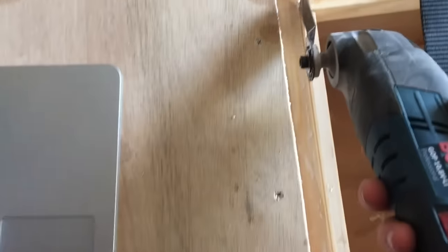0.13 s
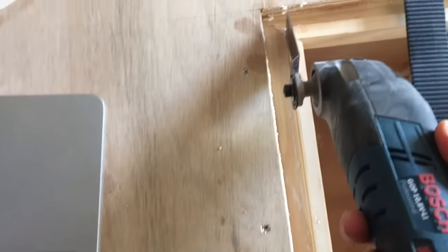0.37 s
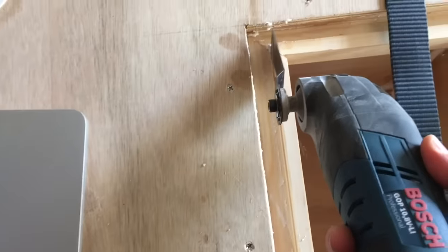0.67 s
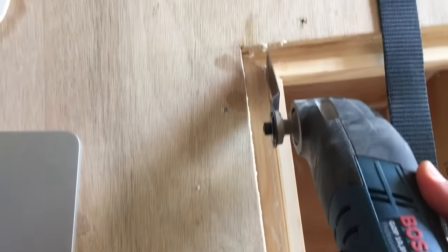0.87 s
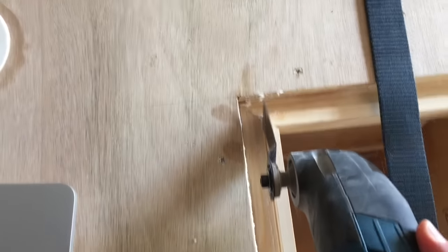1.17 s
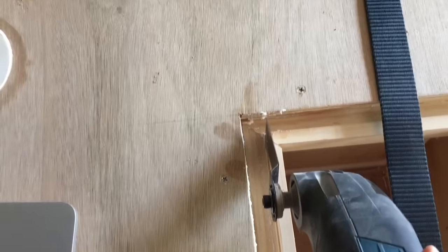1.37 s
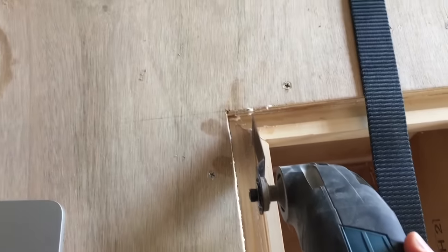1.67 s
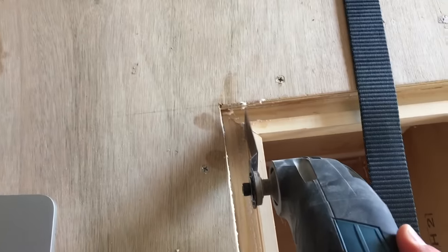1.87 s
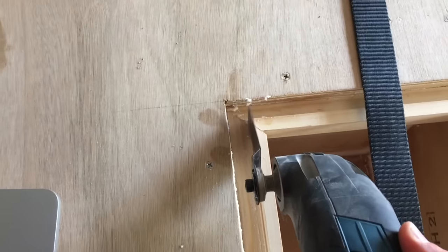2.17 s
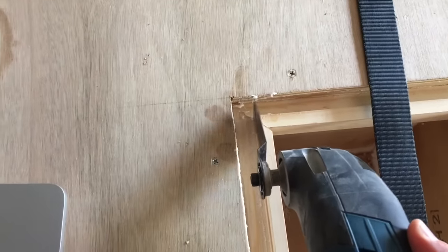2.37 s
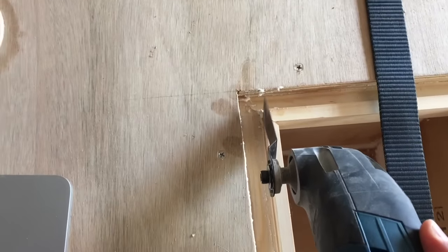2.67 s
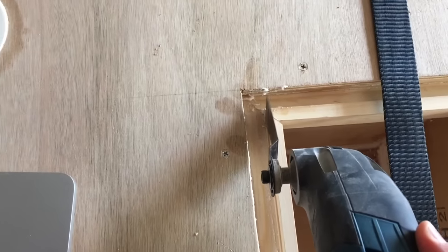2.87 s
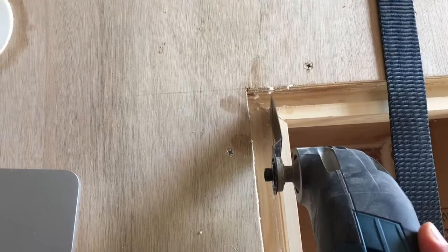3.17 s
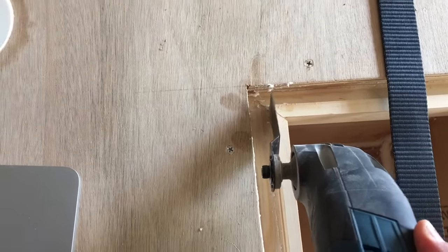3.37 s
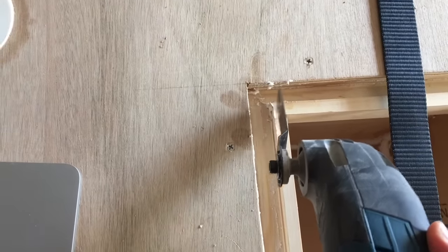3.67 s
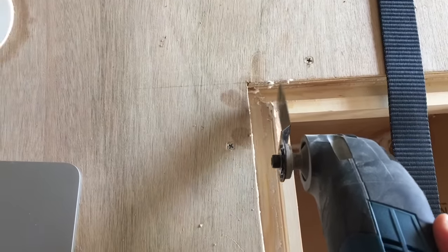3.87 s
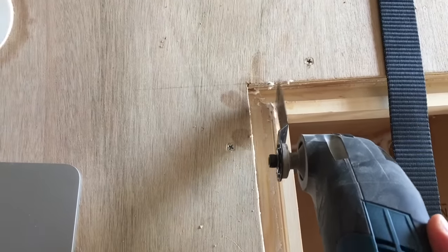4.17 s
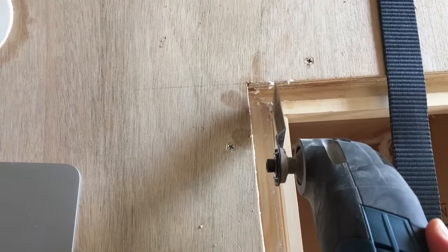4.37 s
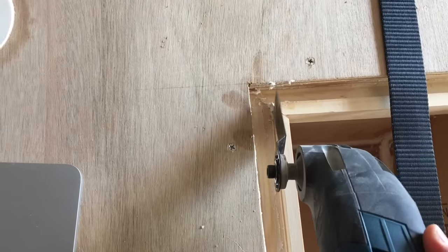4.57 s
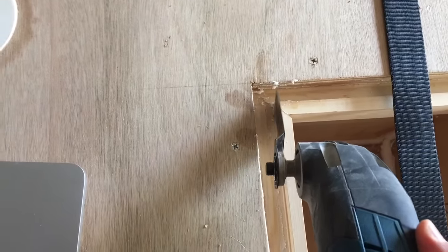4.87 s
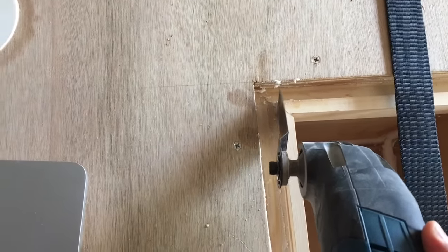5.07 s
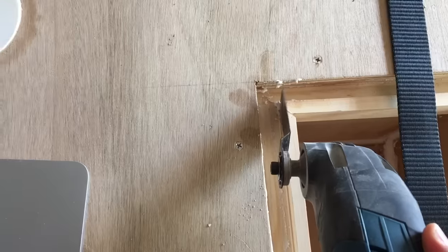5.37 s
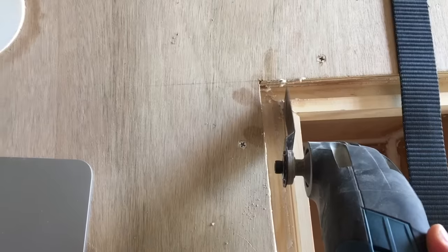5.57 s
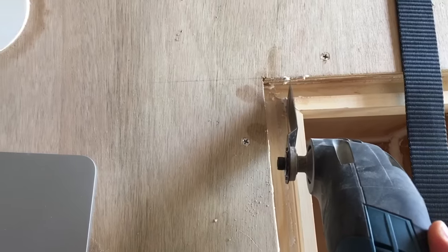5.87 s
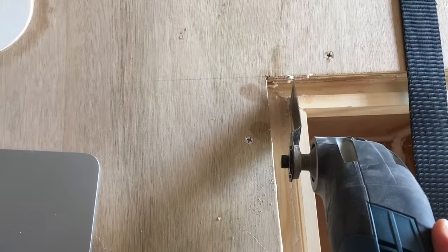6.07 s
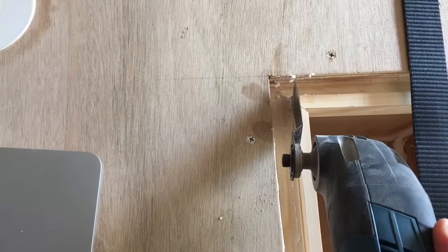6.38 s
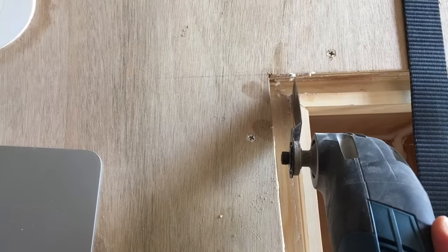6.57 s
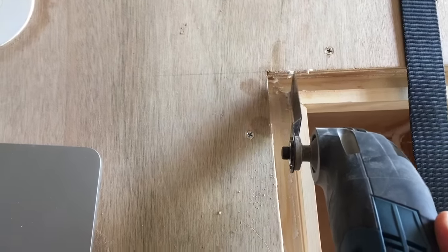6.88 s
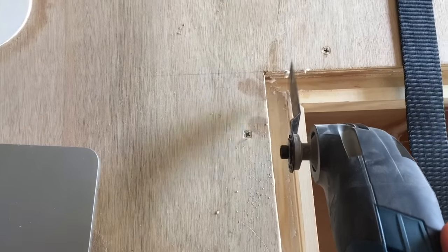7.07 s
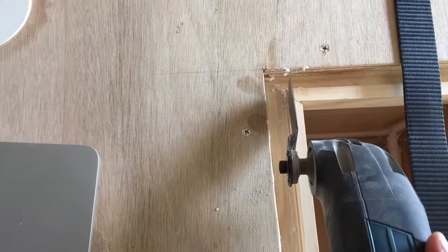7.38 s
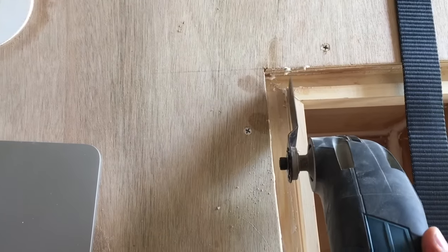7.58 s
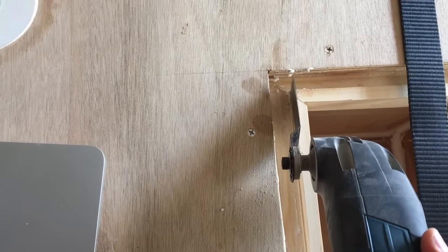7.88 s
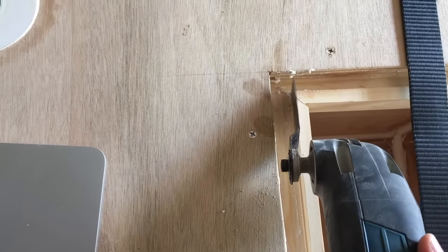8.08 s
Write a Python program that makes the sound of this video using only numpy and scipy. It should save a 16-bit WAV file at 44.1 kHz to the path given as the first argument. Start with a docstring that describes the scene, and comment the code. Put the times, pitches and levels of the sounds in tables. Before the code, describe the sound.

A handheld oscillating power tool buzzes steadily at close range, its blade rasping into timber with rattling chatter, thin squeals and a brief jam.

```python
"""An oscillating multi-tool saws into a timber frame in a garage, close to a mono microphone.
The blade swings about 283 times a second: the body hums, the drive knocks at each swing,
the gears tick and hiss, and the teeth rasp both ways while the blade rings and the frame rumbles.
The blade presses harder at times, chatters on every second swing, snags, squeals and once jams.
When it lifts clear the motor speeds up and the housing whines; bare walls echo the cutting."""
import sys
import numpy as np
from scipy import signal
from scipy.fft import rfft, irfft
from scipy.io import wavfile
from scipy.ndimage import uniform_filter1d, map_coordinates

SR = 44100
rng = np.random.default_rng(int(sys.argv[2]) if len(sys.argv) > 2 else 0)


def dump(signal):
    """Clip the signal to [-1, 1] and save it as 16-bit WAV at the path in sys.argv[1]."""
    limited = np.clip(np.atleast_2d(signal).T, -1, 1)
    pcm = np.round(limited * 32767).astype(np.int16)
    wavfile.write(sys.argv[1], SR, pcm)


N = 363384
T = np.arange(N) / SR
TOP_HZ = 15750  # top of the microphone's range

# the teeth catch and tear: t/s, length/s, level/dB
SNAG_EVENTS = [(0.488, .022, -16.5), (2.364, 0.01196, -18.5), (4.161, 0.024, -26), (4.938, .028, -13),
               (5.032, 0.0131, -16), (6.86, .03, -32)]


def undb(db):
    """Turns decibels into a plain factor."""
    return 10 ** (np.asarray(db) / 20)


def unit(x):
    """Scales a sound to rms 1."""
    return x / np.sqrt(np.mean(x ** 2))


def curves(table):
    """Joins each column of a table by straight lines in time."""
    s, *columns = np.transpose(table)
    return [np.interp(T, s, c) for c in columns]


def walk(rate):
    """Smooth random wander of spread near 1; a higher rate wanders faster."""
    k = max(int(SR / rate), 2)
    steps = np.repeat(rng.standard_normal(N // k + 1), k)
    smooth = uniform_filter1d(uniform_filter1d(steps, k), k)
    return 1.23 * smooth[:N]


def bump(s, length_s):
    """A brief smooth swell, 1 at its peak."""
    return np.exp(-2 * ((T - s) / length_s) ** 2)


def gates(table, edge_s):
    """For each (start, end, ..) row, when it is on (0-1), with sloping edges."""
    rows = []
    for start, end, *_ in table:
        inside_s = np.minimum(T - start, end - T)
        rows.append(np.clip(inside_s / edge_s + .5, 0, 1))
    return np.array(rows)


def spells(table, edge_s=0.01):
    """When any (start, end, dB) spell is on (0-1), and with what force."""
    on = gates(table, edge_s)
    return on.max(axis=0), undb([db for *_, db in table]) @ on


def colour(x, points, size=4096):
    """Filters through (Hz, dB) points without sounding ahead of the input; rms 1."""
    hz, db = np.transpose(points)
    f = np.maximum(np.fft.rfftfreq(size, 1 / SR), 1)
    gain = undb(np.interp(np.log(f), np.log(hz), db))
    # folding the cepstrum gives the filter with the least delay
    cepstrum = irfft(np.log(gain))
    cepstrum[1:size // 2] *= 2
    cepstrum[size // 2 + 1:] = 0
    response = irfft(np.exp(rfft(cepstrum)))
    return unit(signal.fftconvolve(x, response)[:N])


def resonate(x, modes):
    """Makes (Hz, width Hz, dB) modes ring in answer to x; rms 1."""
    total = 0
    for hz, width, db in modes:
        b, a = signal.iirpeak(hz, hz / width, SR)
        total = total + undb(db) * unit(signal.lfilter(b, a, x))
    return unit(total)


def impacts(turns, scatter_db, jitter_ms):
    """One sharp blow per whole turn, each a little different in size and moment."""
    count = np.arange(1, int(turns[-1]))
    chance = rng.standard_normal((len(count), 2))
    at = np.interp(count, turns, np.arange(N)) + jitter_ms * chance[:, 0] * SR / 10 ** 3
    # a short sinc places each blow between samples
    taps = at.astype(int)[:, None] + np.arange(-7, 9)
    offset = taps - at[:, None]
    shape = np.sinc(offset) * np.sinc(offset / 8)
    blows = shape * undb(scatter_db * chance[:, 1:])
    return np.bincount(np.clip(taps, 0, N - 1).ravel(), blows.ravel(), N)


def scrape(turns, bite, scatter_db, grain_db):
    """Fibres snap in one burst of noise per turn; bite sharpens the bursts."""
    sizes = undb(scatter_db * rng.standard_normal(int(turns[-1]) + 2))
    fibres = rng.standard_normal(N) * undb(grain_db * rng.standard_normal(N))
    bursts = np.exp(-bite * np.cos(2 * np.pi * turns))
    return unit(fibres * sizes[turns.astype(int)] * bursts)


def retrace(x, turns):
    """The teeth run over the same fibres again, so each swing partly repeats the last few."""
    total = x
    for k in (1, 2, 3):
        earlier = np.interp(turns - k, turns, np.arange(N))
        total = total + .36 ** k * map_coordinates(x, [earlier], order=1)
    return total


def motor(clear, bounce):
    """Swings so far: the motor gains speed in lifts and loses it to chatter and snags, with a short lag."""
    # swing rate that the pressure of the hand allows, before these gains and losses: t/s, f/Hz
    hand_rate = [(0.0, 281.8), (0.6, 284.1), (0.9, 281), (1.8, 283.9), (2.4, 282), (2.85, 283.9),
                 (3.3, 278.4), (3.45, 284), (4.19, 282.6), (5.39, 286.4), (5.54, 279.6), (5.69, 282.8),
                 (5.99, 277.6), (6.74, 278.7), (6.89, 282.4), (8.24, 282.6)]
    lift_rise_hz, chatter_sag_hz, snag_sag_hz, lag_s = 5.5, 2.3, 9, 0.0314
    hz, = curves(hand_rate)
    caught = sum(bump(s, length) for s, length, _ in SNAG_EVENTS)
    pull = lift_rise_hz * np.sqrt(clear) - chatter_sag_hz * bounce - snag_sag_hz * caught
    keep = np.exp(-1 / (lag_s * SR))
    hz = hz + signal.lfilter([1 - keep], [1, -keep], pull)
    return np.cumsum(hz * (1 + 0.001621 * walk(45))) / SR


def body(turns):
    """The swinging mass shakes the housing: a clean hum."""
    # shaking of the tool body: t/s, level/dB
    shaking = [(0.0, -40), (0.04, -37.5), (1.01, -34.5), (1.05, -40), (2.68, -38), (3.28, -30.5),
               (3.46, -38), (4.61, -38), (4.84, -31), (4.91, -39), (6.13, -30), (6.47, -29.5), (6.75, -38),
               (8.24, -35)]
    hum_db, = curves(shaking)
    return np.sqrt(2) * undb(hum_db + .5 * walk(35)) * np.sin(2 * np.pi * turns)


def drive(turns, clear, jam, bounce, knock_db, throb):
    """The knock at each swing is a stack of overtones that shifts as the blade cuts, jams, lifts or chatters."""
    # buzz of the drive, cutting level before the knock gain: multiple of the swing rate,
    # jammed level/dB, cutting level/dB, lifted level/dB, chattering level/dB
    overtones = [(2, -36, -42, -34, -36), (3, -36, -41.5, -41, -38), (4, -37.5, -43.5, -33, -37.5),
                 (5, -36.5, -35, -34, -40), (6, -30, -32.5, -28, -28.5), (7, -25.5, -29.5, -30, -33.5),
                 (8, -31, -62, -31, -46), (9, -34, -33, -37, -29), (10, -38, -38, -55, -47),
                 (11, -38.5, -45, -33.5, -42), (12, -34, -34, -38, -49), (13, -28.5, -42, -32.5, -40.5),
                 (14, -30, -48, -40, -47), (15, -43, -41.5, -38, -48), (16, -32, -46, -39, -41.5),
                 (19, -34.5, -43, -36, -40), (20, -33.5, -40, -50, -41)]
    grip_order = 9.7  # overtones above this one need a firmer grip, so they come last and go first
    out = 0
    for order, jammed_db, cutting_db, lifted_db, chattering_db in overtones:
        k = round(order)
        # the lowest overtones come from the housing, the upper ones depend on the blade's contact
        contact = np.clip((k - 2) / 4, 0, 1)
        size = undb(cutting_db + contact * knock_db) * (1 + throb)
        # blend towards the level of each other state in turn
        states = (jam ** (k / grip_order), jammed_db), (clear, lifted_db), (bounce, chattering_db)
        for share, db in states:
            size = size + share * (undb(db) - size)
        # each overtone leaves the moving tool with its own slowly drifting lag
        phase = 2 * np.pi * k * turns + 1.06 * walk(1.944)
        out = out + size * undb(1.83 * walk(17)) * np.sin(phase)
    return np.sqrt(2) * out


def whine(turns, force):
    """Near 2 kHz the seventh overtone meets a resonance of the housing and sings out."""
    phase = 2 * np.pi * 7 * turns + .4 * walk(60)
    return np.sqrt(2) * force * undb(1.5 * walk(50)) * np.sin(phase)


def gears(turns, bare):
    """Bearing and eccentric tick and hiss; the ticks are louder when the blade is clear or stuck."""
    # colour of the ticks and the hiss: f/Hz, level/dB
    gear_colour = [(2000, -16), (6000, 6), (7400, 1.5), (8300, 2.5), (9900, 4), (10500, -5), (11300, -3.5),
                   (12000, 3), (12700, 0), (13800, -3), (15000, -2.5)]
    ticks = impacts(turns, scatter_db=1.5, jitter_ms=0.006)
    hiss = scrape(turns, bite=0.067, scatter_db=1.5, grain_db=5.0)
    ticking = undb(-45 + 11 * bare) * colour(ticks, gear_colour)
    return ticking + undb(-31.5) * colour(hiss, gear_colour)


def teeth(turns, bite_db):
    """The teeth tear fibres on both strokes, more on the forward one; the bite throbs and sometimes snags."""
    # colour of the rasp: f/Hz, level/dB
    rasp_colour = [(40, -37), (300, -24.5), (600, -7.5), (760, -16), (1000, -8), (1450, 0), (2100, 5),
                   (2700, 0.5), (3500, -2), (4900, -7.5), (5900, -9), (7200, -19), (15500, -27.5)]
    forward = scrape(turns, bite=0.45, scatter_db=4.5, grain_db=2)
    both = scrape(2 * turns, bite=0.86, scatter_db=1.1, grain_db=5)
    force = undb(bite_db + 1.1 * walk(32))
    for s, length, db in SNAG_EVENTS:
        force = np.hypot(force, undb(db) * bump(s, length))
    return colour(retrace(forward + undb(0.5) * both, turns), rasp_colour) * force


def blade(turns):
    """Friction keeps the thin steel ringing, in fits and starts; it squeals when its flank binds."""
    # ring of the blade rubbing in the kerf (the saw cut), before a 3 dB lift: t/s, level/dB
    rubbing = [(0.0, -37), (1.17, -30.5), (1.47, -34), (3.85, -40.5), (4.41, -34.5), (6.68, -41.5),
               (6.86, -35), (7.46, -39.5), (7.6, -34), (8.24, -42)]
    # the flank of the blade binds and squeals: start/s, end/s, level/dB
    binds = [(.45, .56, -39), (.7, .86, -38), (2.78, 3.2, -40), (3.45, 3.58, -31.5), (4.68, 5.0, -34.5),
             (5.0, 5.34, -31.5), (6.93, 7.05, -31), (7.56, 7.8, -32), (7.8, 8.12, -41)]
    # ringing modes of the blade: f/Hz, width/Hz, level/dB
    ring_modes = [(5712, 40, 4.5), (4240, 140, -4), (8180, 32, -6), (9500, 210, -23)]
    # modes that squeal: f/Hz, width/Hz, level/dB
    squeal_modes = [(11170, 110, -1.5), (8420, 80, -3), (12540, 130, -6.5), (15150, 200, -12)]
    rub_db, = curves(rubbing)
    _, binding = spells(binds, edge_s=0.034)
    friction = scrape(turns, bite=1.7, scatter_db=2.5, grain_db=7.5)
    ring = resonate(friction, ring_modes) * undb(rub_db + 3.0 + 0.9 * walk(28))
    # a faint squeal at -43 dB is always there
    squeal = resonate(friction, squeal_modes) * (binding + undb(-43)) * undb(2 * walk(28))
    return ring + squeal


def frame(turns, shudder_db):
    """Uneven strokes and sudden jolts make the timber and its plywood skin rumble."""
    # the tool jolts the frame: t/s, level/dB
    jolts = [(.17, -44), (2.94, -42), (3.53, -39), (4.18, -41), (5.4, -39), (6.86, -45), (7.74, -47),
             (7.85, -43)]
    # colour of the rumble: f/Hz, level/dB
    timber_colour = [(25, -22), (50, -32), (120, -3), (170, -4), (220, 5), (247, 11), (275, 13.5),
                     (520, -23), (900, -3), (3000, -72)]
    force = undb(shudder_db) + sum(undb(db) * bump(s, length_s=0.044) for s, db in jolts)
    strokes = scrape(turns, bite=0.78, scatter_db=5.5, grain_db=-1.5)
    return colour(strokes, timber_colour) * force


def garage(x):
    """Bare walls return a short dense tail."""
    t60_s, level_db = .25, -11  # time to fade by 60 dB, loudness of the tail
    t = T[:SR // 2]
    tail = rng.standard_normal(len(t)) * undb(-60 * t / t60_s) * (t > .004)
    return undb(level_db) * signal.fftconvolve(x, tail / np.linalg.norm(tail))[:N]


def chatter(turns):
    """The blade slaps the kerf wall, harder on every second swing, which adds a growl an octave down."""
    # colour of the slaps: f/Hz, level/dB
    slap_colour = [(220, -24.5), (800, -7.5), (1150, 0), (1600, 10.5), (2100, -14.5), (2480, 9.5),
                   (2670, 12), (2850, -2), (3150, -9.5), (5000, -16), (7700, -18), (9600, -2), (10500, -10),
                   (15500, -16)]
    strong = unit(impacts(turns / 2, scatter_db=.8, jitter_ms=.013))
    weak = unit(impacts(turns / 2 + .5, scatter_db=2, jitter_ms=.02))
    grit = scrape(turns + .5, bite=0.32, scatter_db=4, grain_db=4.5)
    slaps = strong + undb(-11) * weak + undb(-11) * grit
    # each slap is a quick rising chirp: the dull thud comes first, the brighter ring after it
    t = T[:int(.022 * SR)]
    smear = signal.chirp(t, 0, t[-1], TOP_HZ + 2000)
    return colour(signal.fftconvolve(slaps, smear)[:N], slap_colour)


def judder():
    """The whole tool judders in the hand, so its buzz throbs quickly and unevenly."""
    # spells of judder: start/s, end/s, depth (0-1)
    judders = [(1.452, 2.28, 0.36), (5.417, 5.921, 0.35)]
    rate_hz, edge_s = 36, .06
    depth = np.array(judders)[:, 2] @ gates(judders, edge_s)
    return depth * np.sin(2 * np.pi * rate_hz * T + 2.1 * walk(9.9))


def jamming():
    """How fast the blade is stuck in the kerf (0-1): it grips, holds and slowly works loose."""
    start_s, attack_s, hold_s, release_s = 5.86, .19, 0.16, 0.79
    corners = start_s + np.cumsum([0, attack_s, hold_s, release_s])
    return np.interp(T, corners, [0, 1, 1, 0])


def scene():
    """All sources share the blade's swing; pressing changes rasp and knock, lifts, jams and bounces cut less."""
    # the blade lifts off the cut: start/s, end/s, how far clear (0-1), whine level/dB, buzz gain/dB
    lifts = [(-.02, 0.069, 0.53, -24, -3.5), (0.176, .42, 0.21, -25, 0), (2.334, 2.473, 0.26, -42, -1),
             (2.61, 2.72, 0.66, -28, -1.5), (3.405, 3.459, .3, -47, 1), (4.201, 4.431, .45, -30, 0),
             (6.76, 6.8, 0.28, -50, 2.5), (7.059, 7.302, .9, -53, -0.5), (7.299, 7.53, .99, -44, 0.5)]
    # the teeth press harder, or brush the wood during a lift:
    # start/s, end/s, rasp and shudder gain/dB, knock gain/dB
    touches = [(.44, 0.593, 3, 6), (0.668, 0.893, 2, 9.5), (.96, 1.32, -2.5, 7.5), (1.928, 2.042, 0, 10.5),
               (2.066, 2.246, 2, 3.5), (3.169, 3.396, 1, 9), (5.441, 5.898, 0.5, 4.5),
               (6.782, 6.923, 1.5, 3), (7.044, 7.163, 5.5, -9), (7.245, 7.37, 9.5, 0),
               (7.53, 7.999, 1.5, 3)]
    # the blade bounces in the kerf: start/s, end/s, level/dB
    bounces = [(0.072, 0.182, -25), (2.471, 2.597, -24.5), (2.721, 2.836, -23), (2.995, 3.03, -21),
               (3.449, 3.489, -25), (3.522, 3.563, -26.5), (3.581, 3.62, -22), (3.65, 3.767, -23.5),
               (3.78, 3.824, -23), (3.848, 3.893, -24), (4.005, 4.178, -22.5), (4.44, 4.504, -20.5),
               (4.543, 4.655, -23.5), (4.792, 4.933, -24.5), (5.365, 5.42, -23.5), (6.914, 7.034, -22),
               (7.556, 7.64, -21), (8.116, 8.177, -24.5)]

    _, _, clearance, whine_db, buzz_db = np.transpose(lifts)
    lifted = gates(lifts, edge_s=0.029)
    clear = np.clip(clearance @ lifted, 0, 1)
    touch_db, touch_knock_db = np.transpose(touches)[2:] @ gates(touches, edge_s=0.07)
    bounce, force = spells(bounces)
    jam, throb = jamming(), judder()
    turns = motor(clear, bounce)

    # the first number is plain cutting, the others are changes in dB
    bite_db = -23 + touch_db - 9.5 * clear - 8.5 * jam ** 2 - 2 * bounce
    shudder_db = -48.5 + touch_db - 29 * clear - 7 * jam - 12 * bounce
    knock_db = -4 - 0.36 * T + touch_knock_db  # softens as the kerf deepens

    # the bounces wander a little against the swing, which roughens their upper overtones
    slaps = force * chatter(turns + .018 * walk(70))
    cut = teeth(turns, bite_db) + slaps + blade(turns) + frame(turns, shudder_db)
    buzz = drive(turns, clear, jam, bounce, knock_db, throb) * undb(buzz_db @ lifted)
    singing = whine(turns, undb(whine_db) @ lifted)
    tool = body(turns) + buzz + singing + gears(turns, np.maximum(clear, jam) ** 2)
    return np.tile(tool + cut + garage(cut), (2, 1))  # the same sound in both channels


def record(dry):
    """The microphone cuts the deep bass, rounds the highest peaks and cuts the top."""
    overload = 0.57  # ceiling of the rounded peaks
    bass_cut = signal.butter(3, 52, "high", fs=SR, output="sos")
    top_cut = signal.ellip(12, .1, 85, TOP_HZ, fs=SR, output="sos")
    thinned = signal.sosfilt(bass_cut, dry)
    rounded = overload * np.tanh(thinned / overload)
    return signal.sosfilt(top_cut, rounded)


dry = scene()
out = record(dry)
dump(out)
```